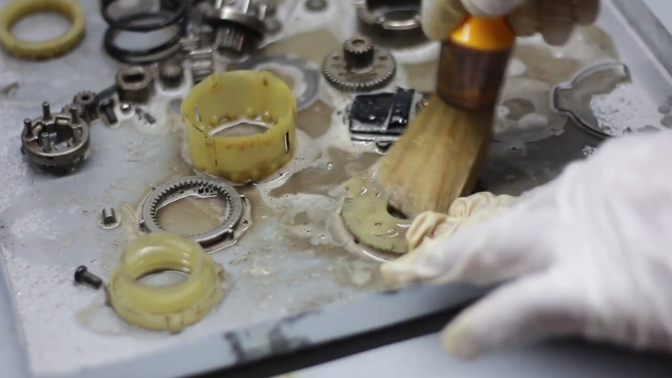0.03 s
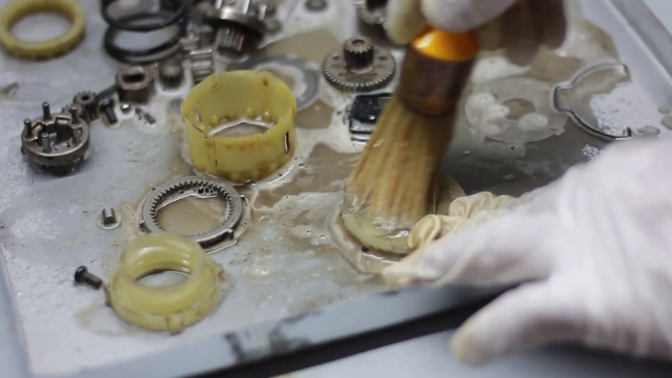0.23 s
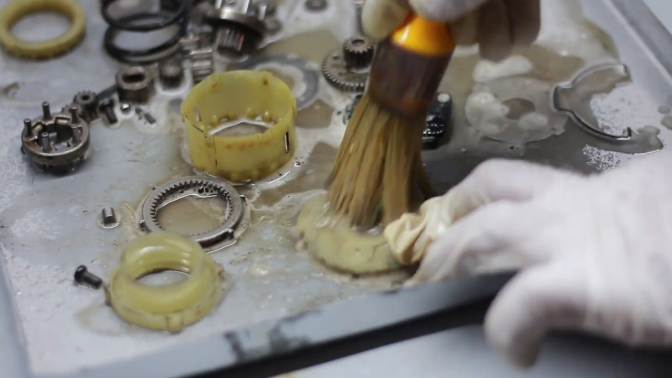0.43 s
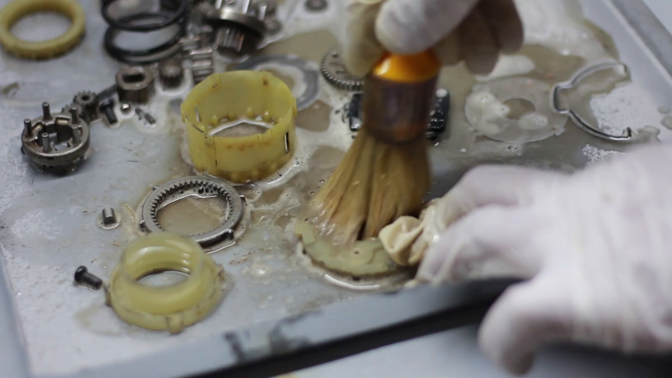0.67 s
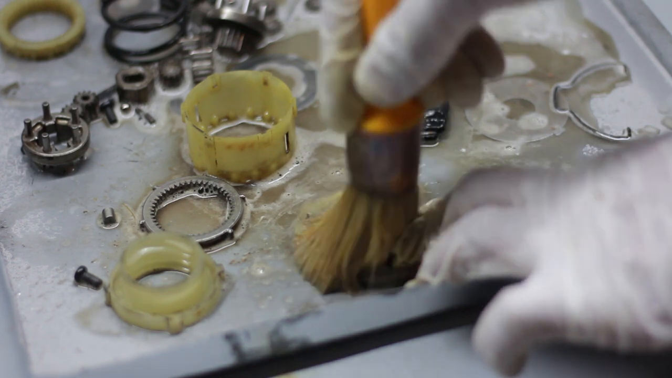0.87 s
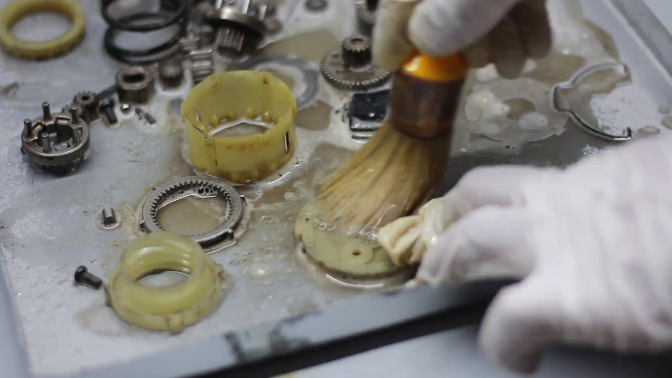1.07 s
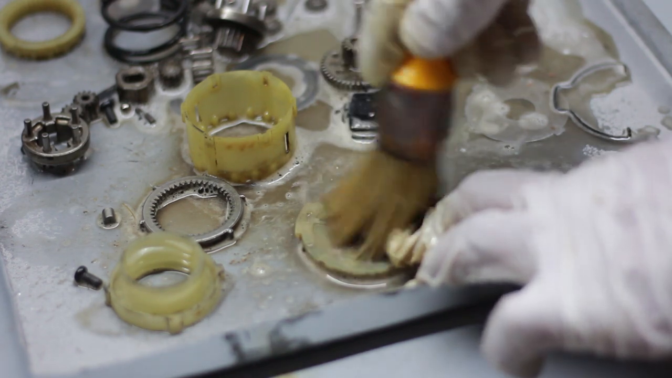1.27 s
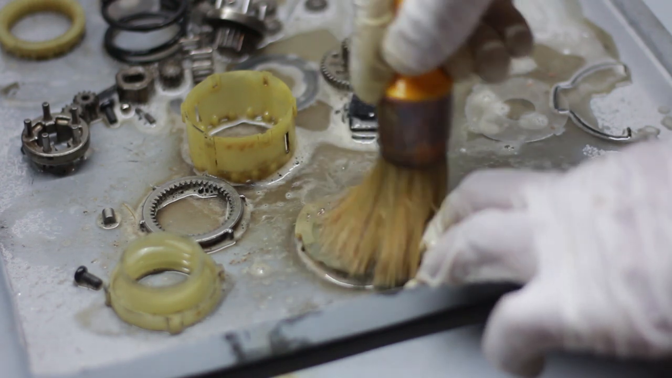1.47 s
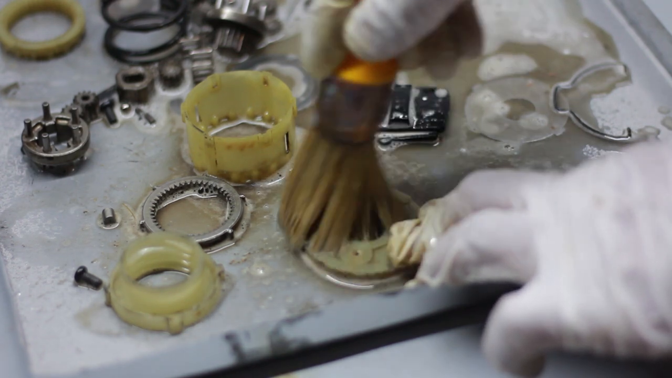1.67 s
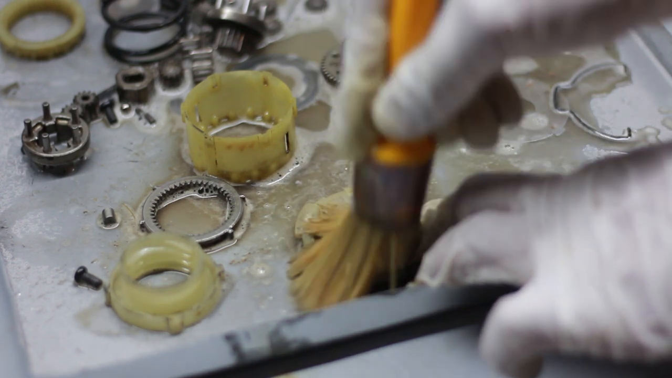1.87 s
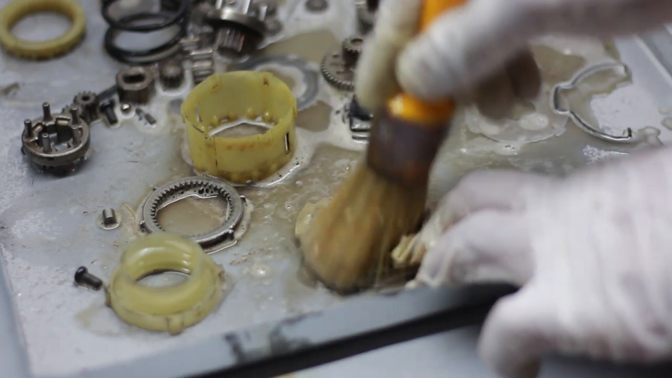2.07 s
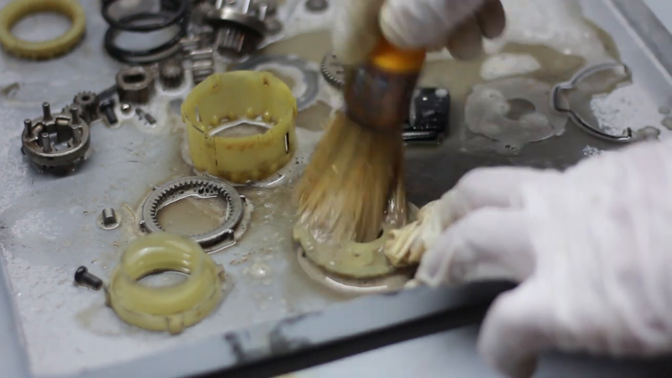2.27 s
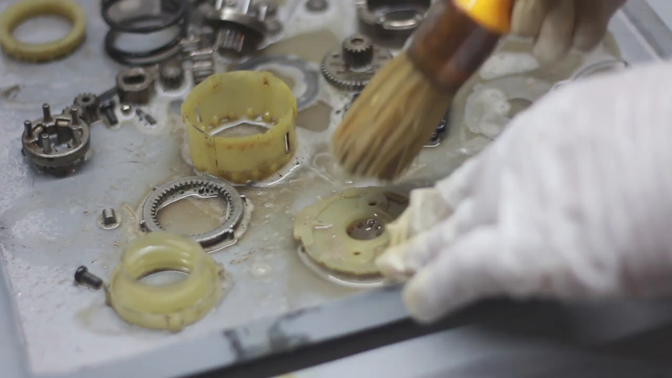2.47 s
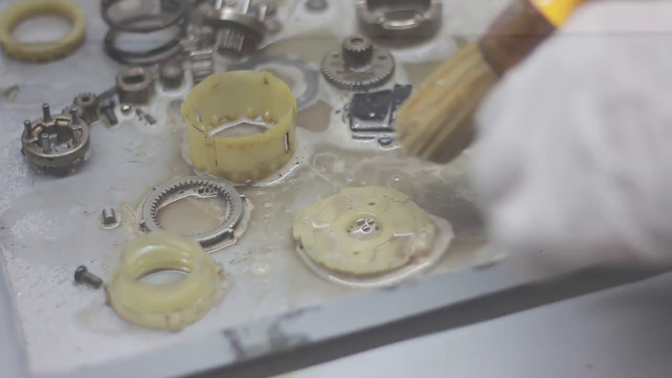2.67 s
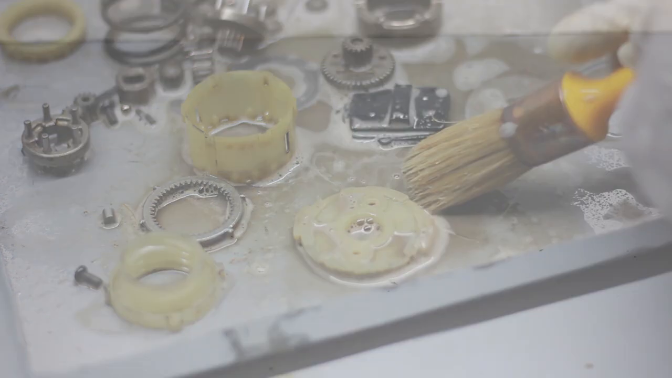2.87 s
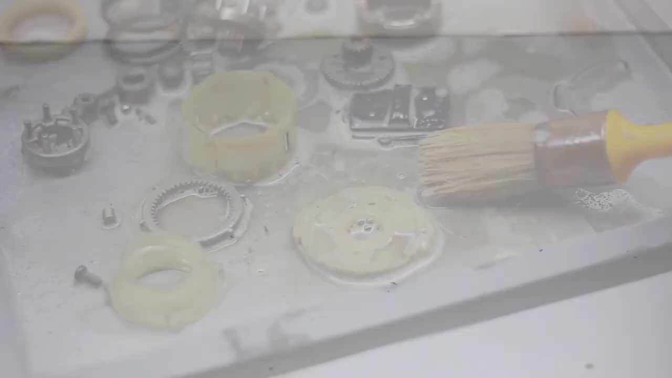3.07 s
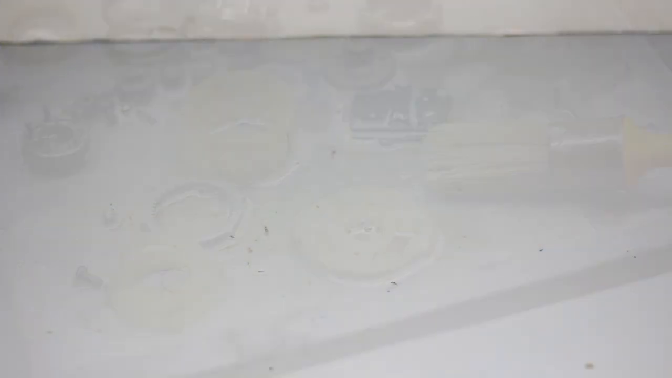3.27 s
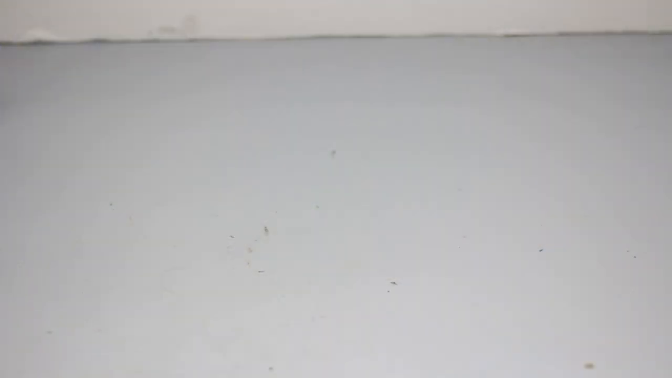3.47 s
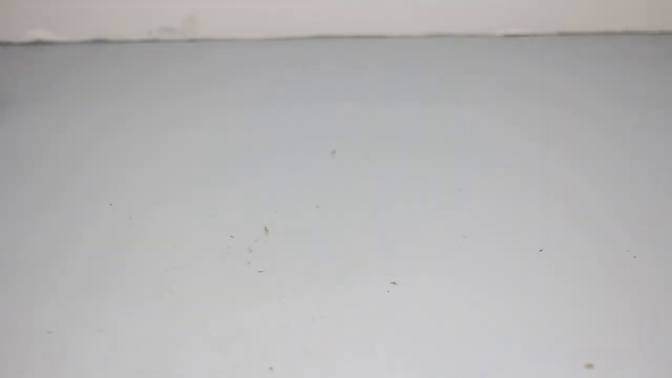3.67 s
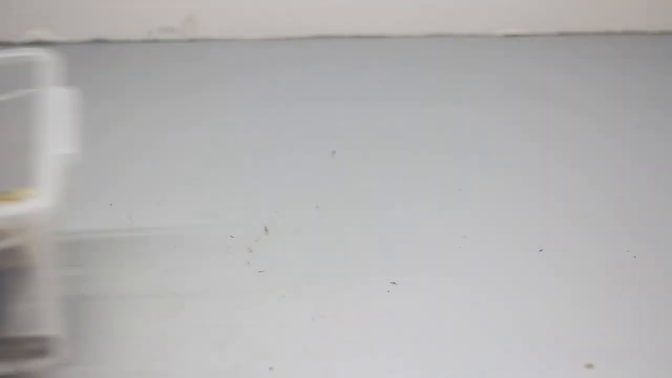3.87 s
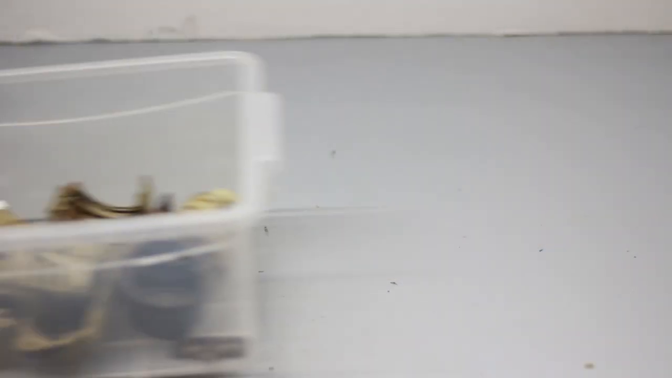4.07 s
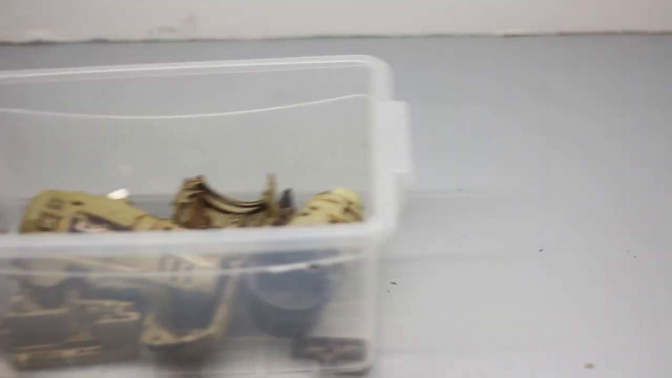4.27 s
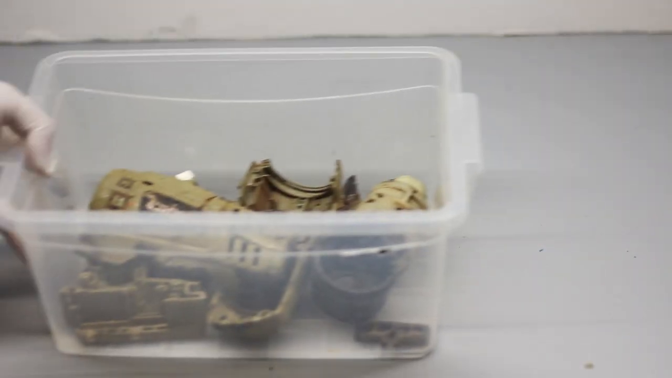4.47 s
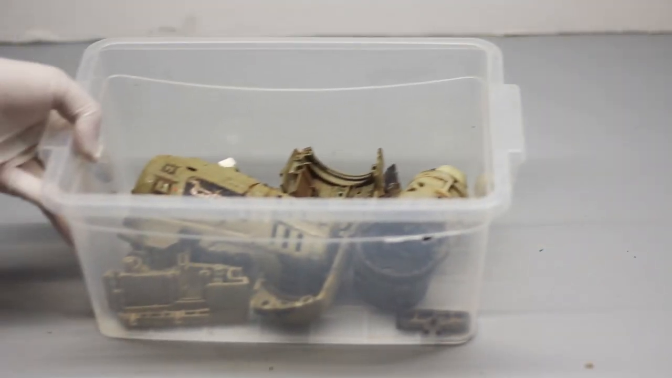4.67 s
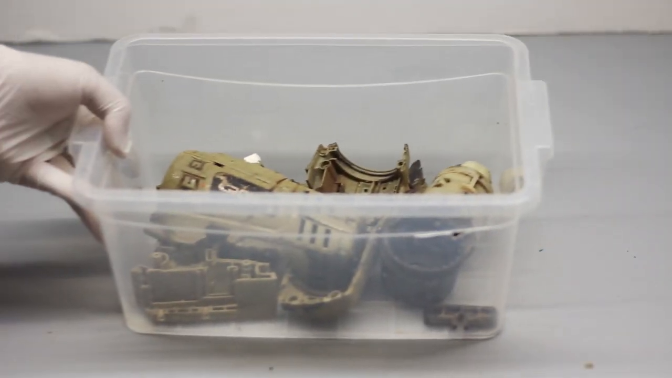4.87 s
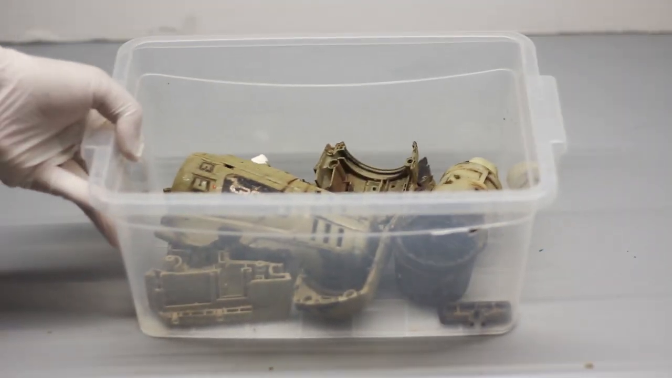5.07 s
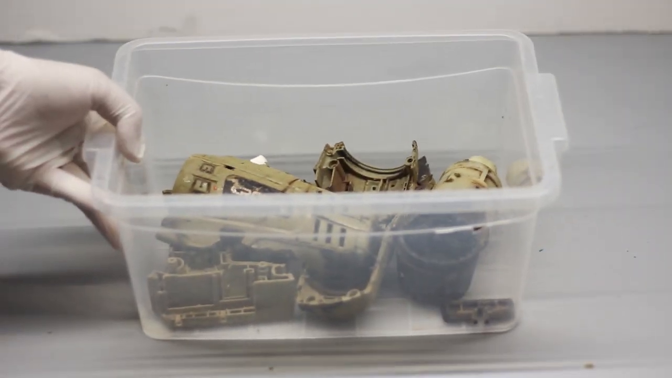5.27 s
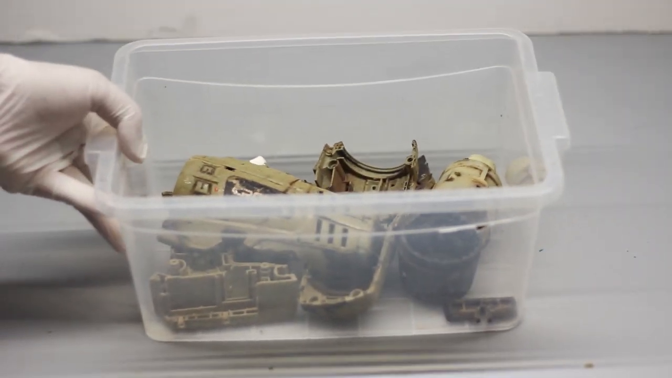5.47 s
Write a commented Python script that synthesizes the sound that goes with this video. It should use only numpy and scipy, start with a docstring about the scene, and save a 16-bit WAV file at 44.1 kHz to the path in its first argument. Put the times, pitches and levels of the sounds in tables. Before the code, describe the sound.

A wet bristle brush scrubs a small disc on a tray with light knocks, then after a quiet gap a plastic tub thumps down and slides.

```python
"""A wet bristle brush scrubs a small disc on a sheet tray, knocking it about; the room falls quiet.
Then a plastic tub of parts lands on a bench and is pushed along it until it stops. One microphone, close.
Rubbing is made of random slips, coloured by what they shake; blows are smooth pushes that ring modes.
Short echoes, steady hiss and a wavering rumble lie behind both."""
import sys
import numpy as np
from scipy import signal
from scipy.io import wavfile
from scipy.ndimage import uniform_filter1d

SR = 44100
rng = np.random.default_rng(int(sys.argv[2]) if len(sys.argv) > 2 else 0)


def transcribe(u):
    """Save the signal u as a 16-bit wav file named by the first command-line argument.

    u: samples, shape (n,) or (channels, n), limited to [-1, 1]; the rate is SR.
    q: integer samples, one column per channel.
    """
    v = np.clip(np.atleast_2d(u).T, -1, 1)
    q = np.round(v * 32767).astype(np.int16)
    wavfile.write(sys.argv[1], SR, q)


N = 242991
TIME = np.arange(N) / SR  # seconds

# Strokes of the brush. Each row: start in seconds, level in dB, length in seconds.
STROKES = [(0.027, -57, 0.031), (0.111, -54, 0.014), (0.144, -51, 0.048), (0.238, -57, 0.029),
           (0.28, -55, 0.13), (0.336, -44, 0.0078), (0.413, -41.5, 0.022), (0.505, -37.5, 0.027),
           (0.526, -31.5, 0.003), (0.571, -52.5, 0.042), (0.74, -58.5, 0.058), (0.819, -54, 0.0052),
           (0.85, -49, 0.027), (1, -58.5, 0.078), (1.079, -57, 0.038), (1.158, -56, 0.067),
           (1.252, -57, 0.055), (1.313, -58, 0.1), (1.403, -55.5, 0.089), (1.492, -56, 0.085),
           (1.563, -62, 0.032), (1.601, -54.5, 0.018), (1.663, -59.5, 0.066), (1.678, -52.5, 0.033),
           (1.758, -59, 0.045), (1.806, -58.5, 0.037), (1.843, -52.5, 0.057), (1.906, -55.5, 0.046),
           (1.962, -59, 0.027), (1.997, -56, 0.028), (2.025, -63, 0.035), (2.06, -56, 0.015),
           (2.097, -60.5, 0.043), (2.158, -58.5, 0.039), (2.212, -53.5, 0.049), (2.28, -50, 0.074),
           (2.325, -37.5, 0.0053), (2.366, -55.5, 0.09), (2.525, -48, 0.02), (2.526, -36, 0.0093),
           (2.545, -62, 0.04), (2.631, -57.5, 0.025), (2.906, -68, 0.061)]
SOFT_STROKE_DB = -53.5  # harder strokes than this rise more slowly and drag the disc more


def brush():
    """Bristles hiss over the work, their drag shakes disc and tray, and the tray drums on the bench."""
    return bristles() + dragged_disc() + drumming_tray()


def bristles():
    """Thousands of bristle slips under the pressure of each stroke, with stiff tufts snapping off an edge."""
    # Bristles lying on the work between strokes. Each row: time in seconds, level in dB.
    contact = [(0.0, -55.5), (0.25, -62.5), (0.45, -60.5), (0.62, -54.5), (0.8, -57), (0.97, -62),
               (1.4, -59), (1.62, -66), (2.1, -73), (2.4, -63), (2.6, -69), (2.72, -82)]
    # Bristle noise spectrum. Each row: frequency in Hz, relative level in dB per Hz.
    bristle_tone = [(1120, -33), (1900, -1.5), (2060, -7), (2250, 0), (2950, -0.5), (3190, 1), (3450, -1.5),
                    (4150, -0.5), (4490, -3), (5550, -1), (6060, 1.5), (7220, 1), (8240, -4), (9310, 0),
                    (15500, -2)]
    power = gain_of(follow(contact)[0]) ** 2
    for s, db, length in STROKES:
        add(power, s, (gain_of(db) * stroke_push(db, length)) ** 2)
    tips = np.sqrt(power) * grit(14000, spread_db=0.0, clump_db=2.5, clump_s=0.004)
    add_snaps(tips)
    return shifting(through(tips, colour(bristle_tone)), patch_db=1.5)


def add_snaps(tips):
    """Each snapping tuft is a burst of chatter that dies within milliseconds; a thin tuft sounds brighter."""
    # Each row: start in seconds, level in dB before the chatter's own peaks, treble lift in dB.
    snaps = [(0.4147, -31.5, -5), (0.578, -44, -4), (0.7662, -40, 0), (0.8574, -50, -4), (1.1902, -43, -6),
             (1.3616, -40, -9), (1.534, -43, 5), (2.2322, -47, -5), (2.3248, -27.5, -7),
             (2.5302, -26, -7.5), (2.9187, -40, 11)]
    burst = np.exp(-TIME[:300] / 0.001)
    for s, db, lift_db in snaps:
        chatter = rng.standard_normal(300)
        thin = np.diff(chatter, prepend=0)  # the slope of the chatter holds its treble
        mixed = gain_of(-lift_db) * chatter + gain_of(lift_db - 3) * thin
        add(tips, s, gain_of(db - 10) * burst * mixed)


def dragged_disc():
    """Friction under the brush pulls in coarser slips that excite the broad modes of disc and tray."""
    # The disc shifting under the resting brush. Each row: time in seconds, level in dB.
    resting_drag = [(0.0, -57.5), (0.15, -69), (0.5, -65), (0.57, -63), (0.7, -63.5), (0.95, -67.5),
                    (1.5, -67.5), (2.0, -70), (2.55, -67.5), (2.72, -82)]
    # Disc and tray under friction. Each row: frequency in Hz, width in Hz,
    # relative level in dB before the allowance for width.
    friction_modes = [(333, 83, -11), (594, 35, -2), (742, 65, -4), (843, 260, 2.5), (1150, 82, -6),
                      (1430, 94, 3.5), (1646, 300, 0.5), (2290, 1000, -0.5), (3104, 330, -0.5)]
    drag_db, drag_per_db = -9.5, 0.2225  # drag against stroke level, and its growth per dB of stroke
    power = gain_of(follow(resting_drag)[0]) ** 2
    for s, db, length in STROKES:
        level_db = db + drag_db + drag_per_db * (db - SOFT_STROKE_DB)
        add(power, s, (gain_of(level_db) * stroke_push(db, length)) ** 2)
    pull = np.sqrt(power) * grit(6000, spread_db=2.0, clump_db=1.5, clump_s=0.0045)
    # a wide mode gets more level and a shorter t60
    body = ring([(hz, db + 10 * np.log10(width), 2.2 / width) for hz, width, db in friction_modes])
    return shifting(without_bass(through(pull, body), hz=248), patch_db=2.0)


def drumming_tray():
    """The hand bears down and the whole tray drums on the bench: dying low noise over a faint shake."""
    # Each row: start in seconds, level in dB.
    presses = [(0.0, -59), (0.335, -54), (0.44, -54.5), (0.51, -57), (0.764, -59), (0.86, -63), (1.03, -71),
               (1.17, -69), (1.33, -62), (1.526, -56), (1.7, -63), (1.87, -56), (2.079, -55.5), (2.2, -58),
               (2.29, -58), (2.38, -63), (2.52, -59), (2.64, -63)]
    # Low drumming spectrum. Each row: frequency in Hz, relative level in dB per Hz.
    drum_tone = [(50, -34), (75, -5.5), (92, -0.5), (110, -12), (150, -5.5), (200, -7), (300, -35)]
    drum_t60, shake_db, shake_end_s = 0.32, -71.5, 2.45  # the shake lasts while the hand works
    power = sum(dying(s, db, drum_t60) for s, db in presses)
    power = power + (TIME < shake_end_s) * gain_of(shake_db) ** 2
    return through(np.sqrt(power) * rng.standard_normal(N), colour(drum_tone))


def knocks():
    """The disc knocks on the tray: stiff spots ring higher and touch for less time."""
    # Each row: start in seconds, thud peak in dB before filtering, frequency this spot favours in Hz,
    # peak of the ringing in dB against the thud.
    disc_knocks = [(0.335, -54, 150, -2), (.416, -60.5, 500, 12), (0.44, -48.5, 137, 5.5),
                   (0.508, -64, 1490, 8), (0.513, -58, 1800, 3), (.517, -51, 3200, 17.5),
                   (0.528, -57, 720, 9), (.766, -43.5, 556, -7.5), (.866, -50, 550, -0.5),
                   (1.335, -65, 136, 10), (1.44, -62, 560, 12), (1.529, -45, 610, -1), (1.69, -59, 600, 11),
                   (1.711, -49, 199, 4.5), (1.871, -52, 677, 6.5), (2.08, -44, 206, -3),
                   (2.324, -57.5, 237, 13.5), (2.513, -49, 400, 5), (2.5261, -23, 370, -8),
                   (2.5294, -29.5, 830, -5)]
    # Modes of the tray. Each row: frequency in Hz, relative level in dB, t60 in seconds.
    tray_modes = [(99, 4, .25), (132.8, -3, 0.39), (199.4, -2, 0.13), (230.4, 0, 0.1), (355.4, 1, 0.063),
                  (468, -8, 0.11), (556, 2.5, 0.087), (732, -2, 0.13), (880, 2, 0.051), (1170, -34, 0.14),
                  (1327, 4, 0.17), (1540, -13, .06), (1810, 10, 0.066), (3150, 12, 0.038)]
    usual_ms, usual_hz, law = 1.92, 622, 0.83
    rows = [(s, db, usual_ms * (usual_hz / hz) ** law, hz, ring_db) for s, db, hz, ring_db in disc_knocks]
    return without_bass(blows(rows, tray_modes), hz=166)


def tub():
    """The tub lands and bumps along the bench while grit grinds under its base."""
    return sliding_tub() + tub_bumps()


def tub_bumps():
    """Short contact favours higher modes; heavy blows are more thud than ring."""
    # Blows on the tub, landing first, then the base catching on the bench.
    # Each row: start in seconds, thud peak in dB before filtering, contact time in milliseconds.
    bumps = [(4.3, -11, 2.32), (4.3012, -30, 0.86), (4.3062, -38, 2.9), (4.359, -27, 2.1),
             (4.407, -25, 2.6), (4.444, -32, 3.9), (4.488, -28, 1.8), (4.516, -33, 1.6),
             (4.545, -24.5, 2.35), (4.678, -37, 2.6), (4.755, -29.5, 1.64), (4.79, -45, 1.3),
             (4.943, -34.5, 2.5), (5.012, -38, 2.3), (5.066, -41, 3.2), (5.153, -40.5, 0.69)]
    # Modes of the tub. Each row: frequency in Hz, relative level in dB, t60 in seconds.
    tub_modes = [(110.6, 21, 0.51), (173, 15.5, 0.032), (309, -4.5, 0.15), (430.4, -7, 0.26),
                 (542, -2, 0.16), (733, -19, 0.21), (1000, -7, 0.078), (1287, 0, 0.065), (1940, -21, .045),
                 (2840, -5, 0.046)]
    usual_hz, usual_ms, law = 410, 2.32, 1
    ring_db, ring_per_db, light_db = -8.5, -0.16, -32  # ringing against thud, its change per dB of blow
    rows = [(s, db, ms, usual_hz * (usual_ms / ms) ** law, ring_db + ring_per_db * (db - light_db))
            for s, db, ms in bumps]
    return blows(rows, tub_modes)


def sliding_tub():
    """Grit slips under the base: the same slips boom in the walls, scrape the bench and fizz on top."""
    # The tub is pushed, slows, jerks to a stop and is nudged once more.
    # Each row: time in seconds, scrape of the base in dB, boom of the walls in dB.
    slide = [(4.378, -43, -35), (4.41, -43.5, -32), (4.64, -44, -34.5), (4.75, -49.5, -42),
             (4.85, -53, -49.5), (4.92, -53, -46.5), (5.034, -56, -54.5), (5.1, -66.5, -56.5),
             (5.148, -62.5, -58), (5.151, -58, -54), (5.18, -65.5, -59.5), (5.27, -81, -72.5),
             (5.358, -70.5, -62.5), (5.49, -89, -77), (5.51, -78, -69)]
    # Spectra of walls, base and finest grit. Each row: frequency in Hz, relative level in dB per Hz.
    boom_tone = [(18, -43), (30, -36), (70, 3.5), (130, -10.5), (173, -3), (215, -5), (264, -1), (351, -3),
                 (466, 0), (810, -14.5), (905, -8), (1090, -13.5), (1300, -14), (1690, -28), (2860, -120)]
    scrape_tone = [(470, -8), (800, -22.5), (905, -2.5), (1090, -9), (1430, -4), (1800, -2), (2200, -7),
                   (2960, -11), (4500, -37), (5850, -35), (9900, -120)]
    fizz_tone = [(2060, -21), (3500, -0.5), (4390, -3), (5620, -2), (6530, -4.5), (8320, -17),
                 (8990, -18.5), (10200, -32), (12000, -36), (15600, -66), (22000, -120)]
    landing_s, settle_s = 4.301, 0.077
    shudder_db, shudder_t60 = -29.5, 0.12  # the walls shudder after the landing
    settle_scrape_db, settle_fizz_db = -58.5, -56  # the parts inside settle
    fizz_db, fizz_top_db = -5.5, -48.5  # level against the scrape, and its soft ceiling

    scrape_db, boom_db = follow(slide)
    settle = (TIME >= landing_s) & (TIME < landing_s + settle_s)
    boom = np.sqrt(gain_of(boom_db) ** 2 + dying(landing_s, shudder_db, shudder_t60))
    scrape = gain_of(scrape_db) + settle * gain_of(settle_scrape_db)
    capped = 1 / np.hypot(gain_of(-scrape_db - fizz_db), gain_of(-fizz_top_db))
    finest = capped + settle * gain_of(settle_fizz_db)

    slips = grit(5000, spread_db=2.5, clump_db=2.5, clump_s=0.0063)
    fine = evened(0.71 * slips + grit(14000, spread_db=3.0, clump_db=1.35, clump_s=0.0052))
    walls = through(boom * slips, colour(boom_tone))
    base = shifting(through(scrape * fine, colour(scrape_tone)), patch_db=0.5)
    fizz = shifting(through(finest * fine, colour(fizz_tone)), patch_db=0.8)
    return walls + base + fizz


def room(x):
    """Echoes: sparse taps of random sign, each band dying at its own speed."""
    # Each row: frequency in Hz, t60 in seconds.
    decay = [(100, 0.14), (500, 0.21), (2000, 0.14), (8000, 0.077)]
    taps = np.zeros(SR // 2)
    at = np.arange(200, SR // 2 - 20, 20)  # one tap in every 20 samples
    taps[at + rng.integers(0, 20, len(at))] = rng.choice([-1., 1.], len(at))
    hz, t, z = signal.stft(taps, SR, nperseg=256)
    fade = gain_of(-60 * t / read(decay, hz)[:, None])
    tail = signal.istft(z * fade, SR, nperseg=256)[1]
    return through(x, tail / np.linalg.norm(tail))


def quiet_room():
    """Steady room and microphone hiss over a low rumble that wavers, both coloured noise."""
    # Spectra of hiss and rumble. Each row: frequency in Hz, relative level in dB per Hz.
    air = [(76, -25), (130, -10.5), (141, -5), (346, -7.5), (375, -7.5), (415, -11), (468, -11.5),
           (1150, -17.5), (2830, -22), (15500, -27)]
    rumble = [(12, -63), (20, -19.5), (59, -0.5), (74, -9.5), (92, -0.5), (124, -32), (140, -4),
              (160, -43.5), (210, -11.5), (350, -120)]
    # Each row: time in seconds, rumble level in dB.
    rumble_level = [(0.0, -70), (0.72, -82), (1.32, -82), (2.21, -79), (3.19, -69), (3.79, -71),
                    (4.24, -67), (4.45, -65), (5.03, -59), (5.51, -62.5)]
    hiss = gain_of(-70) * through(rng.standard_normal(N), colour(air))
    low = through(rng.standard_normal(N), colour(rumble))
    return hiss + gain_of(follow(rumble_level)[0]) * low


def stroke_push(db, length):
    """Pressure of a stroke: start, held, let go; harder strokes dig in more slowly."""
    t = TIME[:SR // 5]
    rise = 0.004 * gain_of(0.5 * (db - SOFT_STROKE_DB))  # seconds
    rise = min(rise, 0.46 * length)  # within a share of the stroke
    return np.tanh(t / max(rise, 0.0005)) * np.exp(-(t / max(length, 0.003)) ** 4)


def grit(per_s, spread_db, clump_db, clump_s):
    """Random slips of random sign, a few large, coming in clumps."""
    chance, large = rng.random(N), rng.exponential(1, N)
    sign_noise, clump_noise = rng.standard_normal((2, N))
    size = max(round(clump_s * SR), 2)
    clumps = evened(uniform_filter1d(uniform_filter1d(clump_noise, size), size))
    strength = gain_of(spread_db * np.minimum(large, 4) + clump_db * clumps)
    return evened((chance < per_s / SR) * np.sign(sign_noise) * strength)


def blows(rows, modes):
    """A smooth push: its slope is heard as a thud and sets the nearest modes ringing; short contact is brighter."""
    out = np.zeros(N)
    for s, db, contact_ms, spot_hz, ring_db in rows:
        phase = np.clip(TIME[:600] * 1000 / np.clip(contact_ms, 0.2, 12), 0, 1)
        thud = -np.gradient(np.sin(np.pi * phase) ** 3)
        # modes lose level with their squared distance in octaves from the spot
        body = ring([(hz, level - 7 * np.log2(hz / spot_hz) ** 2, t60) for hz, level, t60 in modes])
        ringing = np.convolve(body, thud)
        add(out, s, gain_of(db) * thud / abs(thud).max())
        add(out, s, gain_of(db + ring_db) * ringing / abs(ringing).max())
    return out


def ring(modes):
    """Impulse response of dying modes, energy 1."""
    t = TIME[:SR // 2]
    taps = sum(gain_of(db - 60 * t / t60) * np.sin(2 * np.pi * hz * t) for hz, db, t60 in modes)
    return taps / np.linalg.norm(taps)


def dying(s, db, t60):
    """Power that starts at a time and dies away."""
    return (TIME >= s) * gain_of(db - 60 * np.maximum(TIME - s, 0) / t60) ** 2


def shifting(x, patch_db):
    """The rubbing contact keeps changing, so the colour of its noise drifts in patches."""
    z = signal.stft(x, nperseg=256)[2]
    patches = rng.standard_normal(z.shape)
    patches = uniform_filter1d(patches, size=7, axis=0)  # across frequency
    patches = evened(uniform_filter1d(patches, size=12, axis=1))  # along time
    return signal.istft(z * gain_of(patch_db * patches), nperseg=256)[1][:N]


def colour(points):
    """A causal impulse response of energy 1 with this spectrum."""
    half = np.log(gain_of(np.maximum(read(points, np.fft.rfftfreq(8192, 1 / SR)), -100)))
    log_gain = np.concatenate([half, half[-2:0:-1]])
    # minimum phase comes from the Hilbert transform of the log gain
    taps = np.fft.ifft(np.exp(np.conj(signal.hilbert(log_gain)))).real[:4096]
    return taps / np.linalg.norm(taps)


def through(x, taps):
    """Convolution cut to length."""
    return signal.oaconvolve(x, taps)[:len(x)]


def without_bass(x, hz):
    """Small things and small microphones pass no deep bass."""
    return signal.sosfilt(signal.butter(3, hz, "high", fs=SR, output="sos"), x)


def gain_of(db):
    """Decibels to a factor."""
    return 10 ** (np.asarray(db) / 20)


def evened(x):
    """Scales to rms 1."""
    return x / np.sqrt(np.mean(x ** 2) + 1e-20)


def read(points, hz):
    """A curve over frequency, read between its points on a log scale."""
    f, value = np.transpose(points)
    return np.interp(np.log(hz + 1), np.log(f + 1), value)


def follow(rows):
    """The dB columns of a curve at every sample, at -120 dB outside it."""
    s, *columns = np.transpose(rows)
    return [np.interp(TIME, s, db, -120, -120) for db in columns]


def add(mix, s, sound):
    """Mixes a sound in at a time."""
    part = mix[round(s * SR):][:len(sound)]
    part += sound[:len(part)]


def scene():
    """All sources reach one microphone, with the echoes 14 dB down."""
    near = without_bass(brush() + knocks() + tub(), hz=63)
    mono = near + gain_of(-14.0) * room(near) + quiet_room()
    return np.array([mono, mono])


def record(dry):
    """The amplifiers add a faint hiss of opposite sign in the two channels; then the band limit."""
    # Spectrum of that hiss. Each row: frequency in Hz, relative level in dB per Hz.
    apart = [(60, 0), (250, -5), (700, -7), (1500, -9), (15000, -9)]
    fuzz = gain_of(-76) * through(rng.standard_normal(N), colour(apart))
    pair = dry + np.array([fuzz, -fuzz])
    lowpass = signal.firwin(511, 15800, window=("kaiser", 9), fs=SR)  # edge in Hz
    return signal.oaconvolve(pair, lowpass[None], "same")


dry = scene()
out = record(dry)
transcribe(out)
```